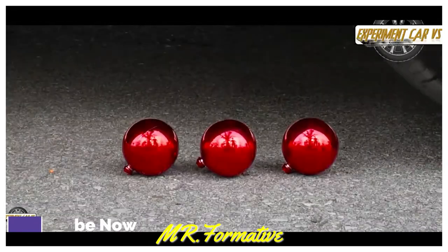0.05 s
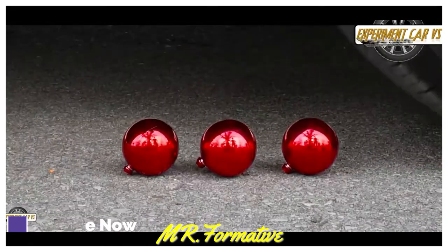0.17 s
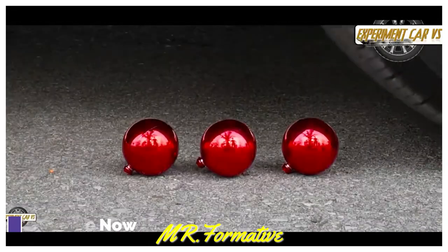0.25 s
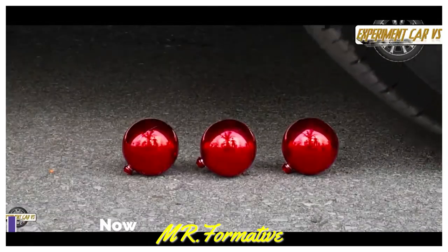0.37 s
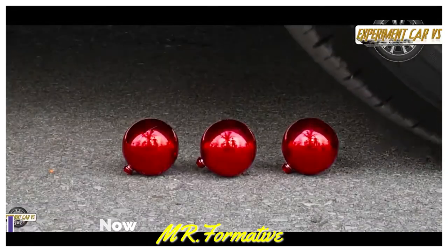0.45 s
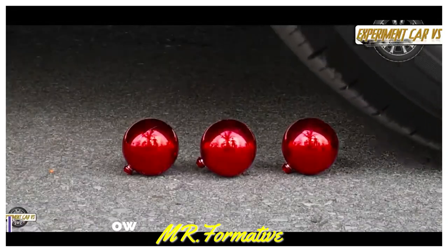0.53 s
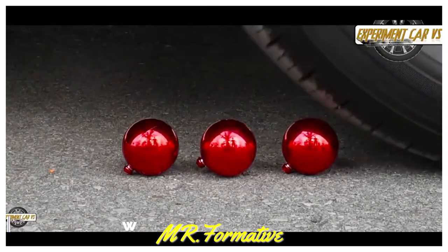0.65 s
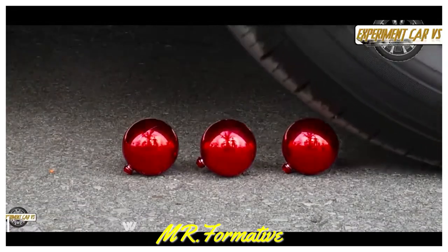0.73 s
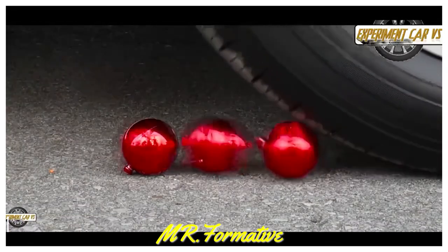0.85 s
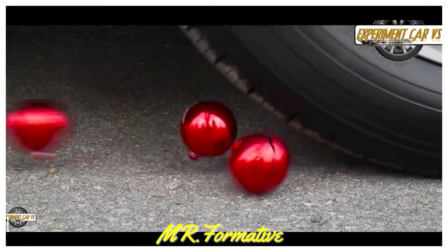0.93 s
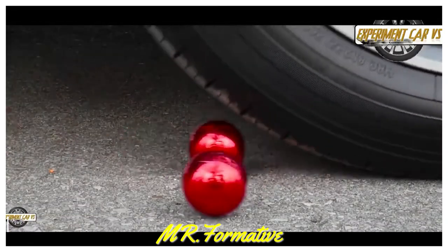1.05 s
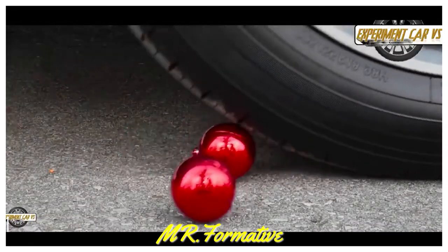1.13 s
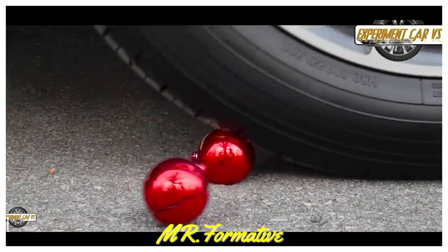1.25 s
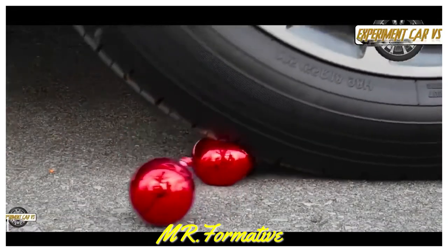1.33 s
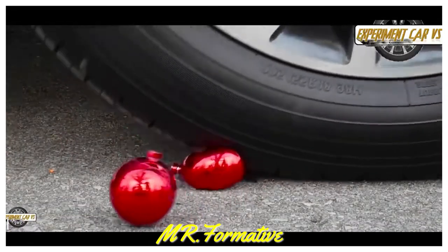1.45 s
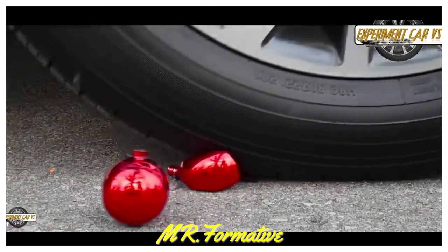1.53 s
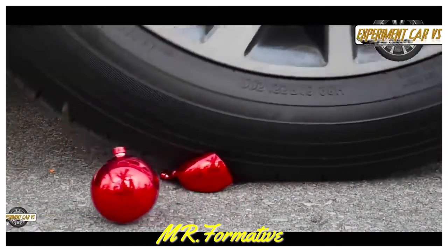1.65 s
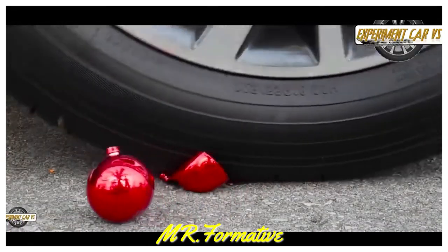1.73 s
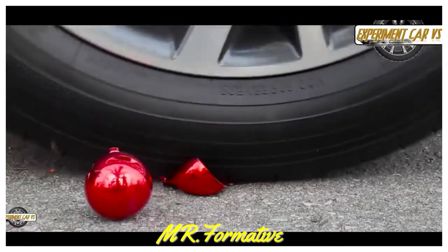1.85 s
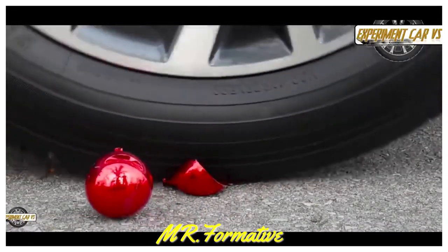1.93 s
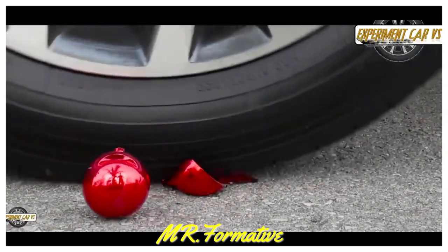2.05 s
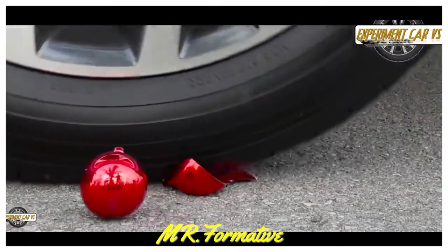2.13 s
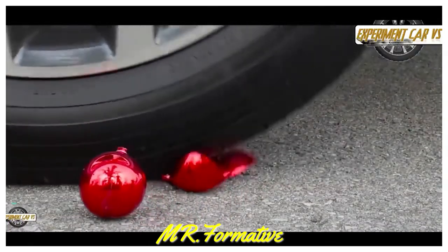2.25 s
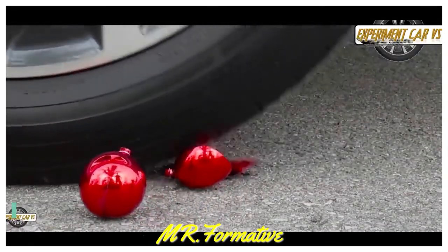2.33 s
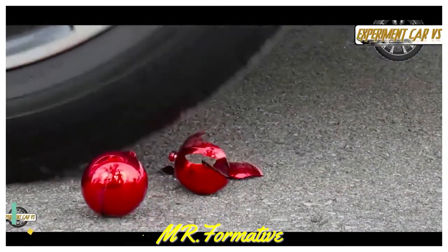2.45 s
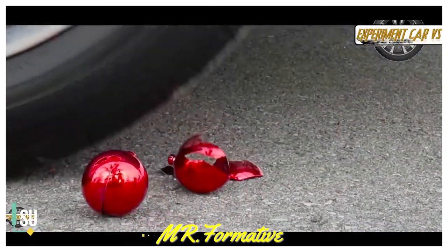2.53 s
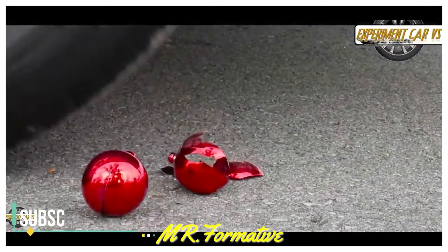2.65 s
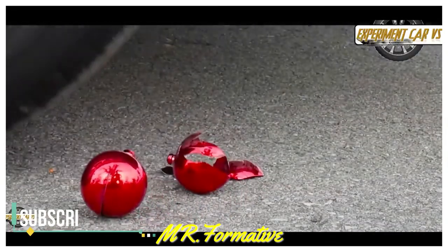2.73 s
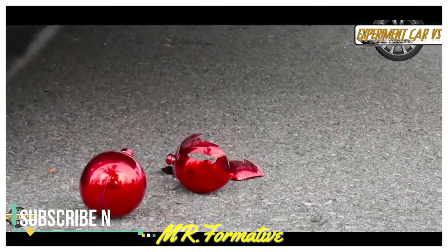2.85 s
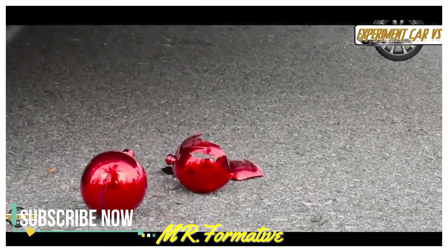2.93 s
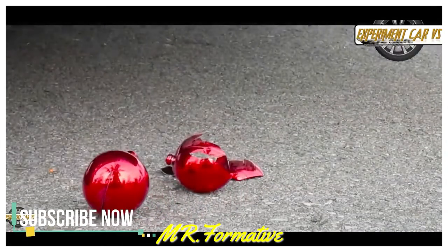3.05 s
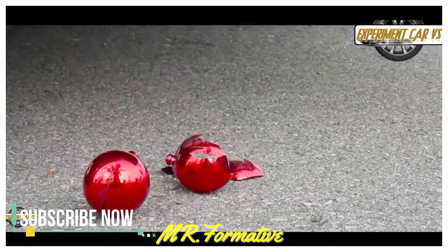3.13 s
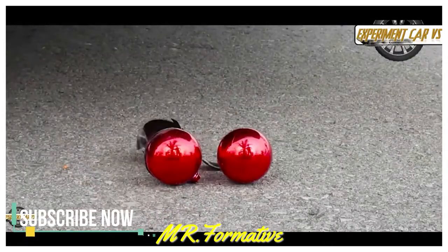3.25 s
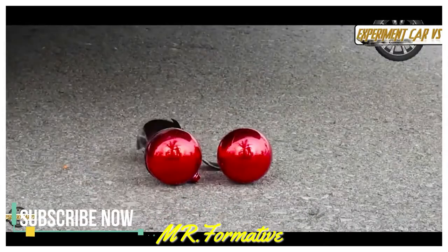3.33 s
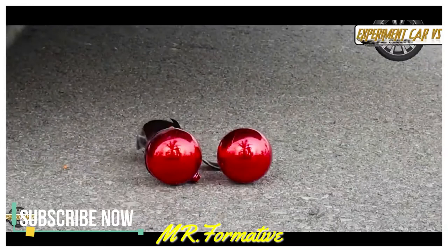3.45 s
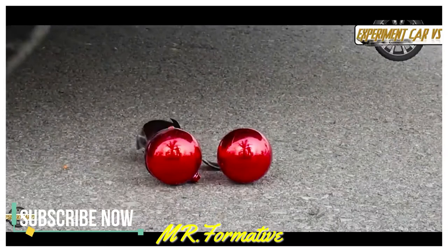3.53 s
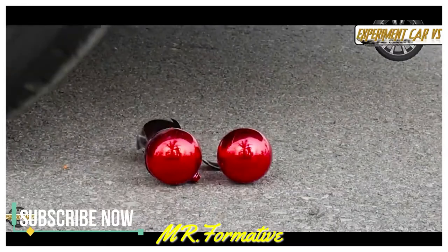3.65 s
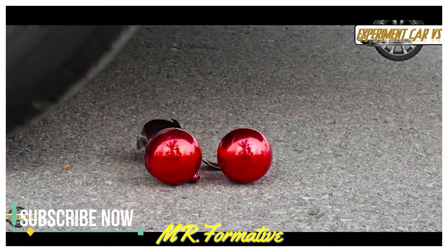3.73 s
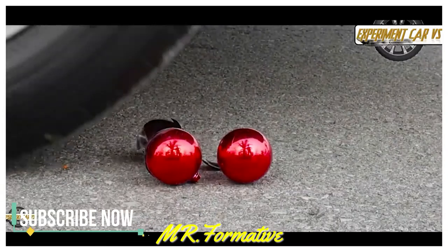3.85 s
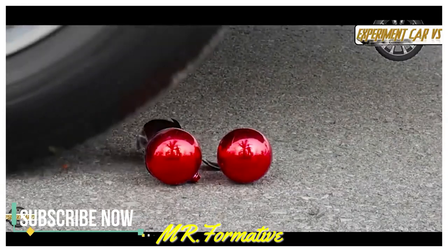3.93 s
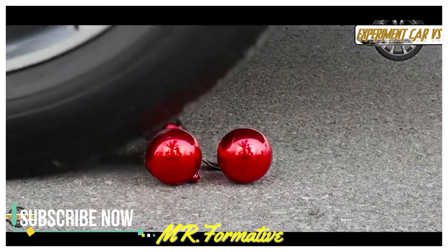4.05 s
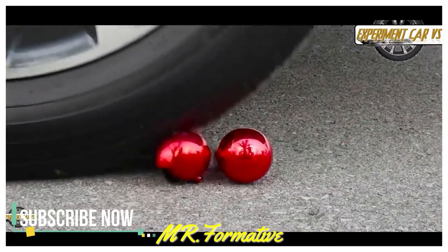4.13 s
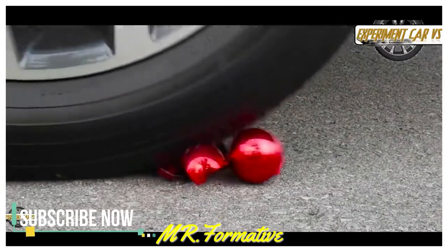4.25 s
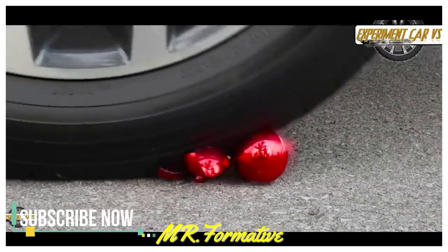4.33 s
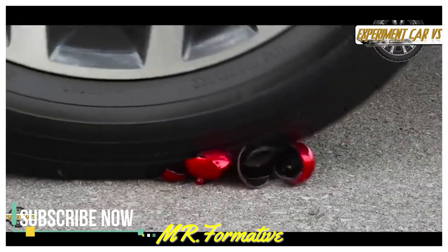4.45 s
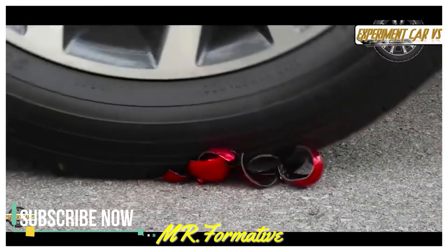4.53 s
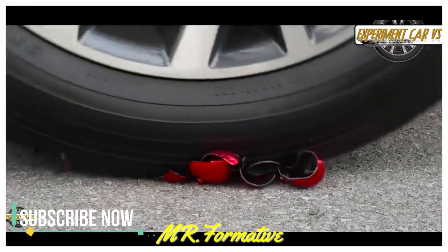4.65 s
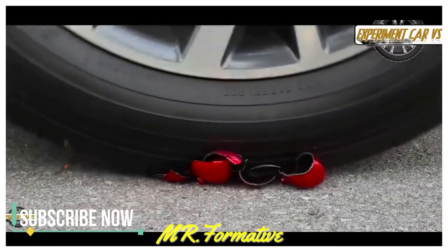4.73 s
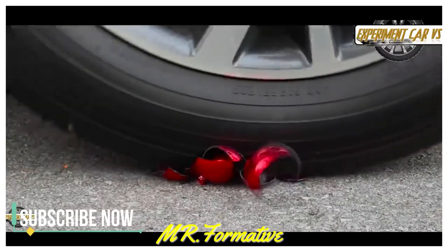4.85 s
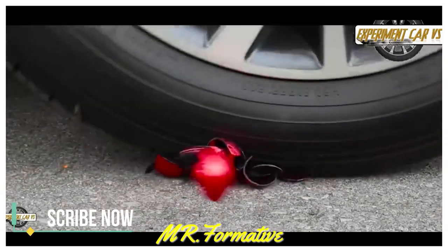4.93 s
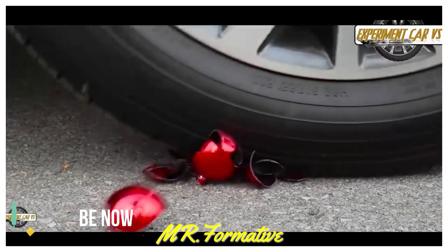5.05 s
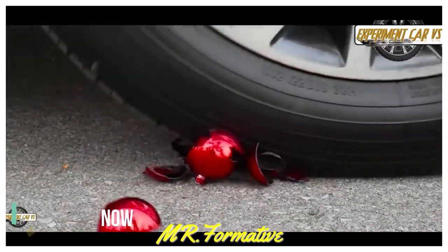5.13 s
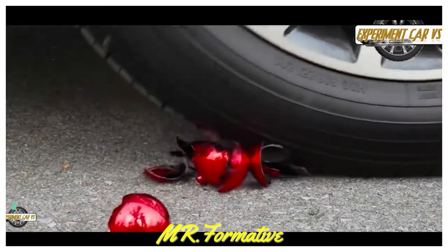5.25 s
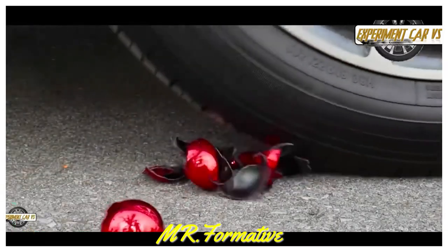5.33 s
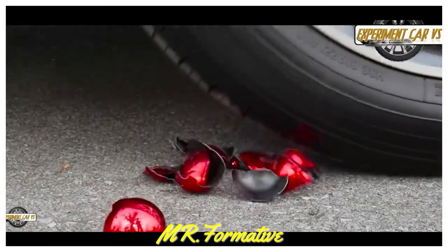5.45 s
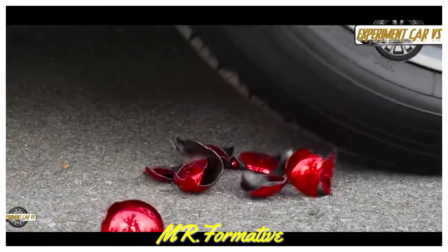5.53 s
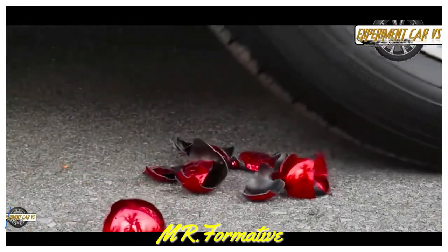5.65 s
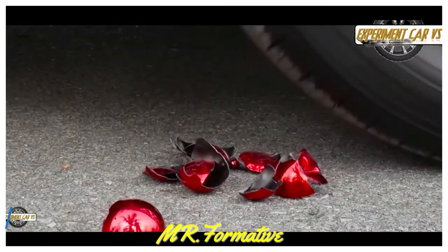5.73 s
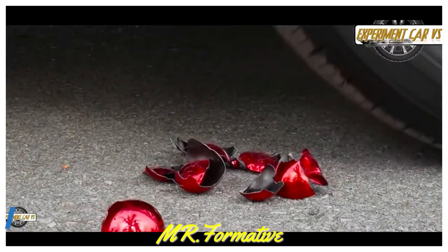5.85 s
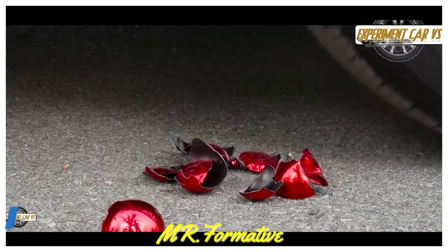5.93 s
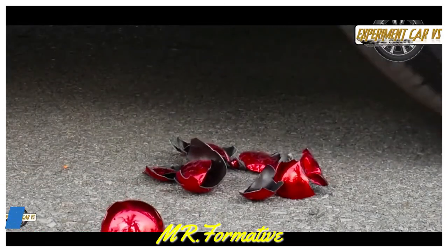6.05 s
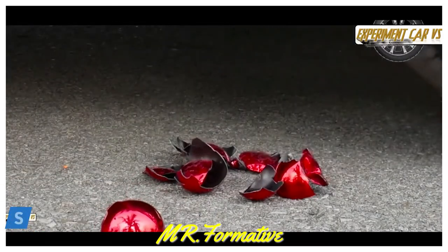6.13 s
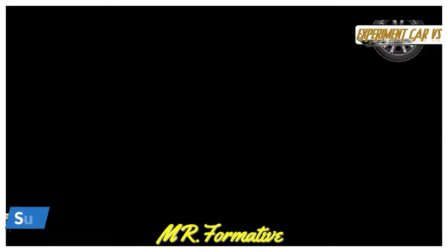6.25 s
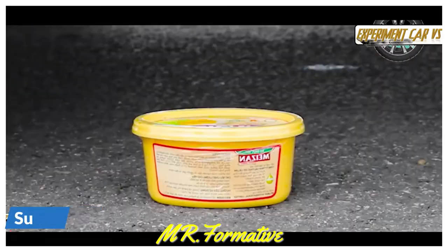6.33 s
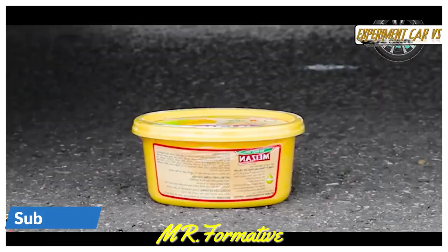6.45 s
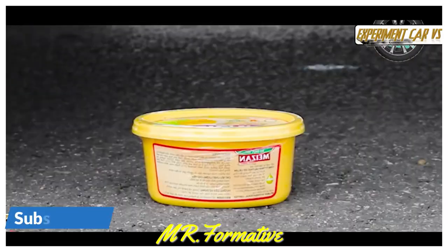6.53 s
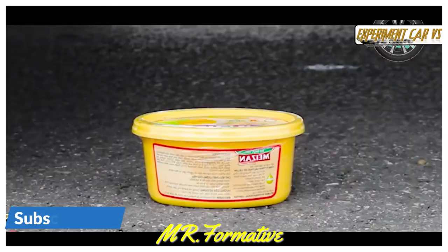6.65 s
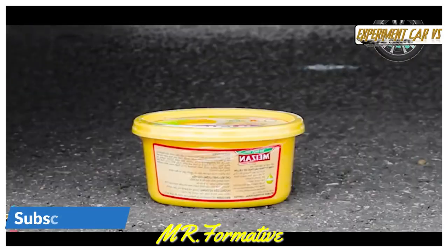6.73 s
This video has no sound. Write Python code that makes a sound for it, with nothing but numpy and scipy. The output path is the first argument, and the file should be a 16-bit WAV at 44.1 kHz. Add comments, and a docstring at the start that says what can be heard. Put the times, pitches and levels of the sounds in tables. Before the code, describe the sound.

Outdoors on asphalt, close microphone. Quiet traffic wash and engine idle, then a tyre crushes thin hollow balls: sharp bright snaps, hollow pops, a low rubbery groan and gritty crunching. Faint ringing taps follow as a ball settles. After a lull the tyre returns with a denser burst of cracks and splintering, trailing off into street noise and a short complete silence.

```python
"""Tyre crushing hollow baubles

A slow car tyre rolls twice over thin hollow baubles on asphalt, close to a microphone.
Shells snap as torn noise with ringing shards, splinters crunch as grains of noise, and balls pop,
skitter and bounce as short hollow notes. Behind them lie traffic (shaped noise) and an idling engine
(resonances). The loudest snaps overload the microphone; near the end all sound cuts out briefly."""
import sys
import numpy as np
from scipy import signal
from scipy.io import wavfile
from scipy.ndimage import uniform_filter1d

SR = 44100
rng = np.random.default_rng(int(sys.argv[2]) if len(sys.argv) > 2 else 0)


def master_out(mix):
    """Clip the mix to full scale and print it as 16-bit PCM to the path in sys.argv[1]."""
    frames = np.transpose(np.atleast_2d(mix))
    ceiling = np.clip(frames, -1, 1)
    pcm = np.round(ceiling * 32767).astype(np.int16)
    wavfile.write(sys.argv[1], SR, pcm)


N = 299174  # length in samples


def gain_of(db):
    """Turns decibels into a gain."""
    return 10 ** (np.asarray(db) / 20)


def evened(x):
    """Scales a sound to an average (rms) level of 1."""
    return x / np.sqrt(np.mean(x ** 2) + 1e-20)


def curve(s, value):
    """Joins points in time with straight lines, one value a sample."""
    return np.interp(np.arange(N) / SR, s, value)


def wavering(depth_db, samples):
    """A gain that wanders at random, smoothed over some samples."""
    return gain_of(depth_db * evened(uniform_filter1d(rng.standard_normal(N), samples)))


def coloured(x, points):
    """Filters a sound to follow a (Hz, dB) spectrum, never sounding ahead of its input."""
    f, db = np.transpose(points)
    hz = abs(np.fft.fftfreq(4096, 1 / SR))
    log_gain = np.log(gain_of(np.interp(np.log(hz + 1), np.log(f + 1), np.maximum(db, -80))))
    # the Hilbert transform gives the minimum phase that belongs to this gain
    taps = np.fft.ifft(np.exp(np.conj(signal.hilbert(log_gain)))).real[:2048]
    unit_taps = evened(taps) / np.sqrt(len(taps))  # white noise keeps its level
    return signal.oaconvolve(x, unit_taps)[:len(x)]


def resonate(x, hz, width_hz):
    """Lets a sound excite one resonance; a narrower one rings longer."""
    r = np.exp(-np.pi * width_hz / SR)
    return signal.lfilter([1, 0, -r], [1, -2 * r * np.cos(2 * np.pi * hz / SR), r * r], x)


def ring(modes, t, luck, spread_db, detune):
    """Dying notes of a shell; every piece has its own size and is struck elsewhere."""
    total = 0
    for (hz, db, t60), (level_luck, pitch_luck) in zip(modes, luck):
        fading = gain_of(db + spread_db * level_luck - 60 * t / t60)
        total = total + fading * np.sin(2 * np.pi * hz * (1 + detune * pitch_luck) * t)
    return total


def splinters(per_s, spread_db, t60):
    """Noise chopped into sparse grains of uneven size, each dying by 60 dB in t60 seconds."""
    struck = rng.random(N) < per_s / SR
    size = gain_of(spread_db * np.minimum(rng.exponential(1, N), 4)) * struck
    fading_power = gain_of(-120 * np.arange(800) / SR / t60)
    grains = np.sqrt(signal.oaconvolve(size ** 2, fading_power)[:N].clip(0))
    return evened(grains * rng.standard_normal(N))


# Fractures and taps: (time [s], relative level [dB], pitch of the snapping shard [Hz])
FRACTURES = [(0.9463, -1.5, 8790), (0.9535, -2.5, 9040), (0.9633, -6.5, 9470), (1.0127, 5, 7470),
             (1.0272, 0.5, 7530), (1.1052, -36, 4500), (1.1378, -29.5, 7010), (1.1713, -33.5, 6660),
             (1.2032, -20, 8900), (1.211, -29, 2770), (1.2554, -30.5, 3810), (1.2906, -23.5, 9200),
             (1.3045, 5.5, 7020), (1.4327, -4, 3300), (1.45, 2, 7200), (1.4581, 4, 7630),
             (1.4748, 3, 10810), (1.4789, -3.5, 4700), (1.492, 6, 10140), (1.5486, 5, 9800),
             (1.5627, -9, 9450), (1.6379, -8.5, 4417), (1.6463, -7, 4100), (1.6704, -16.5, 8900),
             (1.6788, -11, 4300), (1.7031, -12.5, 5024), (1.7142, -12.5, 4080), (1.7208, -6.5, 3744),
             (1.725, -5, 10460), (1.7358, -8, 10150), (1.7423, -12, 6270), (1.7536, -5, 6020),
             (1.7684, 4, 4800), (1.7834, -10.5, 11010), (1.7874, -16.5, 3633), (1.8101, 1, 9850),
             (1.8207, -8, 5170), (1.8305, -4, 4453), (1.8667, -0.5, 6090), (1.8804, -8, 6455),
             (1.8869, -7, 3500), (1.9222, 1.5, 10550), (1.9457, -7.5, 4610), (1.9897, -2.5, 9010),
             (2.0245, -21.5, 4460), (2.0501, -22, 10340), (2.0859, -32.5, 9040), (2.1707, -26, 6690),
             (2.2455, -34.5, 5770), (2.293, -35.5, 10440), (2.327, -0.5, 6750), (2.5181, -39, 4760),
             (2.565, -37, 6200), (2.5901, -38, 2520), (2.6317, -41, 6900), (2.6526, -38.5, 9300),
             (2.7087, -39, 1870), (2.7678, -34.5, 9300), (2.8339, -31, 5600), (2.89, -29.5, 9300),
             (2.929, -39, 9250), (2.981, -39.5, 9300), (3.0251, -23, 7140), (3.0793, -34.5, 7260),
             (4.1871, -24.5, 1840), (4.2353, -12.5, 1840), (4.2555, 11, 9760), (4.2784, 4, 7134),
             (4.287, -8, 1880), (4.3111, 3, 11390), (4.3181, -9.5, 3467), (4.331, -5, 1924),
             (4.3439, -1.5, 10400), (4.356, -6, 9420), (4.3607, -5.5, 9300), (4.3835, 6.5, 10070),
             (4.4034, -9.5, 2012), (4.4208, -4, 2562), (4.431, -4, 10100), (4.4543, -2.5, 6840),
             (4.4616, -2.5, 9960), (4.4679, -7, 6660), (4.4765, -4, 8860), (4.4956, 0, 10460),
             (4.5065, 6, 9115), (4.528, 1.5, 9180), (4.5447, -8.5, 4416), (4.55, -4, 6810),
             (4.5582, -12, 7500), (4.57, -3, 9120), (4.6073, -10.5, 11050), (4.619, -8, 10460),
             (4.6361, -22.5, 10350), (4.6551, 1, 8690), (4.6634, -3, 10060), (4.6719, -2, 10880),
             (4.6849, -3, 9700), (4.7126, -7.5, 10140), (4.742, -12.5, 5200), (4.7935, -25, 3000),
             (4.8168, -10.5, 4230), (4.8229, -0.5, 9600), (4.8444, 0.5, 3900), (4.8549, -5, 2870),
             (4.878, -9, 10130), (4.9122, -8.5, 9900), (4.9389, 2, 4250), (4.9492, 3.5, 9350),
             (4.9531, -6.5, 3908), (5.0598, -8.5, 9540), (5.0882, -32.5, 3700), (5.1253, -34, 2780),
             (5.1852, -21.5, 2670), (5.1932, -21.5, 2600), (5.22, -23.5, 9900), (5.3327, -16.5, 7330),
             (5.346, -31.5, 2860), (5.403, -21, 10200), (5.4244, -35, 12370), (5.4712, -36, 10500),
             (5.485, -32, 4800), (5.583, -39, 9700)]
# Colour of a fracture, also of the crunch: (frequency [Hz], relative level [dB])
FRACTURE_COLOUR = [(710, -33), (1200, -7.5), (2120, -2.5), (3120, -1.5), (4570, -1.5), (6940, 1.5),
                   (7830, -0.5), (11000, 3), (15100, -15), (16500, -34)]
# Ringing notes of a shell: (frequency [Hz], relative level [dB], time to fall 60 dB [s])
SHELL_NOTES = [(5450, -2, .05), (6900, -2, .04), (7500, -8, .04), (8700, -1, .025), (10300, -3, .02)]
# While a whole ball rolls free: (from [s], to [s])
FREE_BALL = (2.2, 3.3)


def cracks(tone_db=1.0, held_db=-34, free_db=-11, tap_db=-4, rattle_db=-30, rattle_t60=0.032,
           width_hz=900, stray_db=-5, swell_db=-17, swell_s=0.0013, jolt_db=-23, jolt_t60=0.02):
    """Each fracture or tap: tearing noise, the shard's own pitch and a stray one, ring and rattle."""
    lead = 400  # samples ahead of the snap
    t = (np.arange(6000) - lead) / SR
    after = np.maximum(t, 0)
    tear, out = np.zeros(N + len(t)), np.zeros(N + len(t))
    noise = rng.standard_normal((len(FRACTURES), 3, len(t)))
    luck = rng.standard_normal((len(FRACTURES), len(SHELL_NOTES), 2))
    stray_hz = 2000 * 6 ** rng.random(len(FRACTURES))
    # a faint, very short swell of noise just before each snap, fading again after it
    swell = gain_of(swell_db) * np.exp(-abs(t) / swell_s)
    rattle = (t > 0) * gain_of(rattle_db - 60 * t / rattle_t60)
    # the tread jolts as the shell gives way
    jolt = gain_of(jolt_db - 60 * after / jolt_t60) * np.minimum(after / 0.0012, 1)
    for (s, db, hz), (a, b, c), shard, other_hz in zip(FRACTURES, noise, luck, stray_hz):
        start = round(s * SR) - lead
        at, size = slice(start, start + len(t)), gain_of(db)
        # light taps of a free ball ring; held shell is damped
        loose = FREE_BALL[0] < s < FREE_BALL[1] and db < -15
        # 8.6 ms for a 0 dB snap at 6 kHz; big and lightly held shards last longer
        t60 = 0.0086 * (6000 / hz) ** 0.067 * np.exp(-0.0419 * db)
        fall = np.minimum(after / 0.00033, 1) * gain_of(-60 * after / np.maximum(t60, .003)) + swell
        fall = fall * gain_of(tap_db if loose else 0)  # a tap tears little
        tear[at] += size * (.5 * a * fall + rattle * b)
        own = evened(resonate(c, hz, width_hz))
        stray = gain_of(stray_db) * evened(resonate(c, other_hz, width_hz))
        out[at] += size * gain_of(tone_db) * 0.54 * fall * (own + stray)
        out[at] += size * gain_of(free_db if loose else held_db) * ring(SHELL_NOTES, after, shard, 5.5, .02)
        out[at] += size * jolt * evened(resonate(b, 560, 1000))
    return (coloured(tear, FRACTURE_COLOUR) + out)[:N]


# A wall of shell caves in and crumbles: (time [s], level [dB], time to fall 60 dB [s])
COLLAPSES = [(0.956, -33.5, .3), (1.024, -21, 0.094), (1.15, -47, 0.29), (1.213, -44.5, 0.63),
             (1.311, -28, .48), (1.464, -20, .14), (1.574, -21, 0.15), (1.877, -28.5, .14),
             (1.938, -37, 0.15), (1.999, -42, 0.15), (2.335, -46.5, .23), (2.413, -38.5, 0.44),
             (4.233, -23, 0.68), (4.392, -30, 0.21), (4.476, -23.5, .42), (4.675, -19, .11),
             (4.831, -37, .3), (4.948, -17.5, 0.062), (5.066, -43, 0.16), (5.158, -37.5, .12),
             (5.257, -37.5, 0.15), (5.403, -46, .15)]
# Steady grinding of splinters, one list for each pass of the tyre: (time [s], level [dB])
GRINDING = [
    [(0.869, -64.5), (0.933, -45.5), (1.09, -60.5), (1.6, -48), (1.728, -33.5), (1.86, -42), (2.07, -57.5),
     (2.18, -47.5), (2.6, -63.5), (3.03, -50), (3.399, -68)],
    [(4.12, -65), (4.22, -29.5), (4.3, -50.5), (4.77, -49), (5.0, -53), (5.24, -47.5), (5.31, -51.5),
     (5.478, -46.5), (5.64, -53.5), (5.7, -81)],
]
# Colour of the dull squeeze: (frequency [Hz], relative level [dB])
SQUEEZE_COLOUR = [(15, -49.5), (25, -15.5), (168, -6.5), (221, 0.5), (262, -1.5), (1270, -3), (2500, -14),
                  (3250, -45), (5500, -120)]


def crunch(pitched=0.54, squeeze_db=-19, follow=0.66, lumps_db=2.5):
    """Splinters under the tread, each size in its own clumps, and the dull lumpy squeeze with them."""
    t = np.arange(N) / SR
    caving_power = 0
    for s, db, t60 in COLLAPSES:
        drop_db = np.maximum(803.5 * (s - t), 60 * (t - s) / t60)  # rises at 803.5 dB per second
        caving_power = caving_power + gain_of(db - drop_db) ** 2
    grinding = gain_of(curve(*np.transpose(GRINDING[0] + GRINDING[1])))
    level = np.sqrt(caving_power + grinding ** 2)
    rolling = 0
    for rows in GRINDING:
        first, last = rows[0][0], rows[-1][0]
        rolling = rolling + curve([first, first + 0.023, last - .05, last], [0, 1, 1, 0])
    bits = 0
    for hz in np.geomspace(2400, 12000, 7):
        clumps = wavering(4, 900)
        bits = bits + evened(resonate(clumps * splinters(200, 4., .014), hz, .25 * hz))
    fine = evened(coloured(splinters(900, 4., .01) + pitched * bits, FRACTURE_COLOUR))
    fine *= wavering(3, 1100) * gain_of(-1)  # the tread bites in fits
    lumps = wavering(lumps_db, 500)
    dull = evened(coloured(lumps * rng.standard_normal(N), SQUEEZE_COLOUR))
    return rolling * (level * fine + gain_of(squeeze_db) * level ** follow * dull)


# Hollow pops of the balls: (time [s], relative level [dB], pitch [Hz])
POPS = [(1.0139, -2, 1404), (1.015, -15.5, 257.4), (1.0271, -13, 1477), (1.051, -30, 274),
        (1.105, -28, 1500), (1.13, -33.5, 1290), (1.1712, -26, 1410), (1.2007, -26.5, 805),
        (1.221, -28.5, 1250), (1.262, -22.5, 1210), (1.287, -25, 618.5), (1.3317, -19, 907),
        (1.4312, -15.5, 655), (1.4468, -7, 1150), (1.459, -13, 271), (1.4787, -16.5, 1390),
        (1.4928, -19, 1430), (1.5468, -21.5, 1376), (1.7232, -30, 570), (1.7674, -21, 563),
        (1.9224, -23.5, 1040), (4.188, -25, 1480), (4.206, -22.5, 910), (4.2185, -21, 749),
        (4.2262, -21, 1440), (4.2338, -6.5, 1515), (4.2517, -5.5, 1464), (4.2801, -18, 1588),
        (4.3087, -16, 1689), (4.3327, -14, 1870), (4.3411, -18.5, 1757), (4.3577, -14.5, 1740),
        (4.3819, -22.5, 1582), (4.4039, -17.5, 1893), (4.421, -18.5, 1669), (4.4927, -13.5, 1584),
        (4.506, -16, 877), (4.5266, -21.5, 1001), (4.5422, -23, 723.4), (4.6703, -17, 1679),
        (4.6859, -21.5, 950), (4.7417, -24.5, 590), (4.7949, -21.5, 600), (4.822, -10.5, 570),
        (4.8411, -11, 1950), (4.9379, -14.5, 1905), (5.335, -34, 1140), (5.4, -32, 1520)]


def knocks(t60=0.032, thud_db=-5, thud_t60=0.017, rough=0.74):
    """Air and wall of a ball pop at a pitch set by how far it is squashed, over a wide dull thud."""
    t, out = np.arange(4000) / SR, np.zeros(N + 4000)
    noise = rng.standard_normal((len(POPS), 2, len(t)))
    onset = np.minimum(t / .0008, 1)
    for (s, db, hz), (a, b) in zip(POPS, noise):
        pop = np.sin(2 * np.pi * hz * t) + rough * evened(resonate(a, hz, 0.19 * hz))
        thud = gain_of(thud_db - 60 * t / thud_t60) * evened(resonate(b, 1200, 1400))
        longer = (1000 / hz) ** 0.15  # low pops last longer
        fall = gain_of(-60 * t / t60 / longer)
        out[round(s * SR):][:len(t)] += gain_of(db) * onset * (pop * fall + thud)
    return out[:N]


# A knocked ball skids away: (time [s], pitch [Hz], level [dB])
SKID_PATH = [(1.03, 1600, -41), (1.1, 1496, -47.5), (1.38, 1204, -44)]


def skid(width_hz=160):
    """A knocked ball skids away; grit excites its hollow note, whose pitch sinks as it goes."""
    s, hz, db = np.transpose(SKID_PATH)
    turn = np.exp(2j * np.pi * np.cumsum(curve(s, hz)) / SR)
    r = np.exp(-np.pi * width_hz / SR)
    # shift the moving note down to 0 Hz, smooth there, and shift it back
    note = (turn * signal.lfilter([1 - r], [1, -r], splinters(90, 2.5, .03) / turn)).real
    on = curve([s[0], s[0] + .01, s[-1] - .03, s[-1]], [0, 1, 1, 0])
    return gain_of(curve(s, db)) * evened(note) * on


# Tyre shudder: (time [s], pitch [Hz], level [dB])
SHUDDER = [(1.05, 202.6, -48.5), (1.251, 207.8, -38), (1.41, 203.8, -41.5), (1.6, 196.5, -53.5),
           (2.1, 204.6, -63)]


def groan(waver_db=2.2, under_db=-7):
    """The tyre shudders on a low wavering note, a rough half note beneath, while the first ball slips."""
    s, hz, db = np.transpose(SHUDDER)
    on = curve([s[0] - .02, s[0], s[-1], s[-1] + 0.023], [0, 1, 1, 0])
    waver = wavering(waver_db, 1500)
    note = np.sqrt(2) * waver * np.sin(2 * np.pi * np.cumsum(curve(s, hz)) / SR)
    under = gain_of(under_db) * evened(resonate(rng.standard_normal(N), 112, 30))
    return on * gain_of(curve(s, db)) * (note + under)


# Colour of the traffic wash: (frequency [Hz], relative level [dB])
TRAFFIC_COLOUR = [(15, -40), (25, -7), (220, -15), (266, -9), (378, -11.5), (706, -8.5), (1510, -16),
                  (1930, -15), (11000, -30.5), (15200, -36.5), (16500, -58)]
# Notes of the engine bay: (frequency [Hz], width [Hz], level against the wash [dB])
ENGINE_NOTES = [(163, 30, -18), (683.6, 13, -7), (833, 30, -8.5), (1006, 190, -10.5)]
# Background over time: (time [s], street level [dB], rumble level [dB])
BACKGROUND = [(0, -54, -73), (0.899, -55, -85), (2.101, -53, -64), (3.1, -53, -57.5), (3.4, -58.5, -59.5),
              (4.099, -58, -65.5), (5.002, -50, -69), (5.6, -48, -66.5), (5.72, -56.5, -86),
              (6.461, -53, -76)]


def street(swell_db=-0.86):
    """Traffic wash with a gentle swell, fuzzy notes of the idling engine and a low rumble."""
    s, wash_db, rumble_db = np.transpose(BACKGROUND)
    swell = wavering(swell_db, 3000)
    no_bass = signal.butter(2, 60, "high", fs=SR)
    wash = evened(signal.lfilter(*no_bass, coloured(rng.standard_normal(N), TRAFFIC_COLOUR)))
    notes = 0
    for hz, width_hz, db in ENGINE_NOTES:
        notes = notes + gain_of(db) * evened(resonate(rng.standard_normal(N), hz, width_hz))
    rumble = evened(resonate(resonate(rng.standard_normal(N), 60, 130), 60, 130))
    return swell * (gain_of(curve(s, wash_db)) * (wash + notes) + gain_of(curve(s, rumble_db)) * rumble)


# Tilt of the left-right difference: (frequency [Hz], relative level [dB])
DIFFERENCE_TILT = [(25, 15), (120, 7.5), (500, 10.5), (1200, 5), (3000, 2.5), (15000, 11.5)]
# Colour of the hiss: (frequency [Hz], relative level [dB])
HISS_COLOUR = [(500, -18), (3000, -1), (8000, -1), (16000, -7.5)]


def scene(share=.45):
    """All sources sit in front; a faint scrambled copy and a hiss differ by side, flickering in patches."""
    mid = cracks() + crunch() + knocks() + skid() + groan() + street()
    hiss = gain_of(-68.0) * coloured(rng.standard_normal(N), HISS_COLOUR)
    apart = gain_of(-20) * coloured(mid, DIFFERENCE_TILT) + hiss
    z = signal.stft(apart, nperseg=1024)[2]
    field = evened(uniform_filter1d(rng.standard_normal(z.shape), size=24, axis=0))
    field = field + .5 * rng.standard_normal(z.shape[1])
    # keep the given share of patches in time and pitch
    patches = uniform_filter1d(field, size=2, axis=1) > np.quantile(field, 1 - np.clip(share, .05, 1))
    scramble = np.exp(2j * np.pi * rng.random(z.shape))
    side = signal.istft(z * patches * scramble, nperseg=1024)[1][:N]
    return np.array([mid + side, mid - side])


def low_pass(x):
    """Removes everything above the highest recorded frequency."""
    return signal.sosfilt(signal.butter(12, 16740, fs=SR, output="sos"), x)


# Dips of the microphone housing: (frequency [Hz], relative level [dB])
HOUSING = [(2400, -1), (3200, 1), (5000, 0.5), (5750, -3), (6500, 0.5), (7600, 0.5), (8200, -2.5),
           (9000, 0)]
# Brief silence: (from [s], to [s])
GAP = (6.321, 6.452)


def record(dry):
    """Microphone colour, hard overload on the peaks, a treble limit and the silent gap."""
    t = np.arange(N) / SR
    sounding = (t < GAP[0]) | (t > GAP[1])
    clipped = np.clip([coloured(x, HOUSING) for x in dry], -.9, .9)
    limited = signal.oaconvolve(clipped, signal.firwin(255, 16300, fs=SR)[None], "same")
    mix = limited * sounding
    return low_pass(mix)


dry = scene()
out = record(dry)
master_out(out)
```